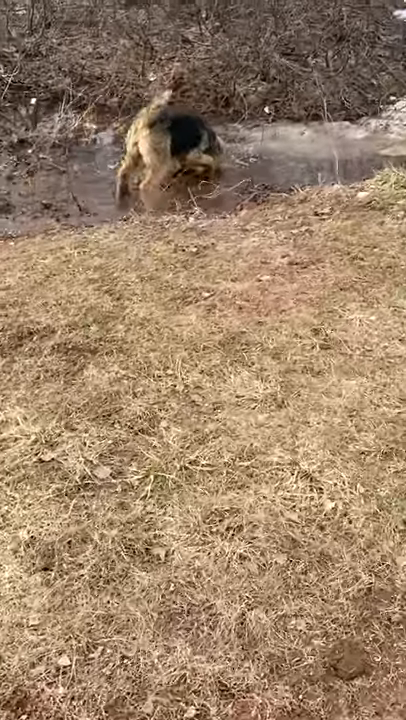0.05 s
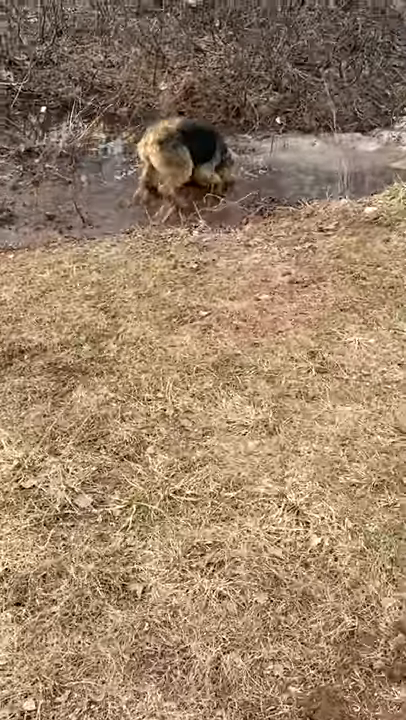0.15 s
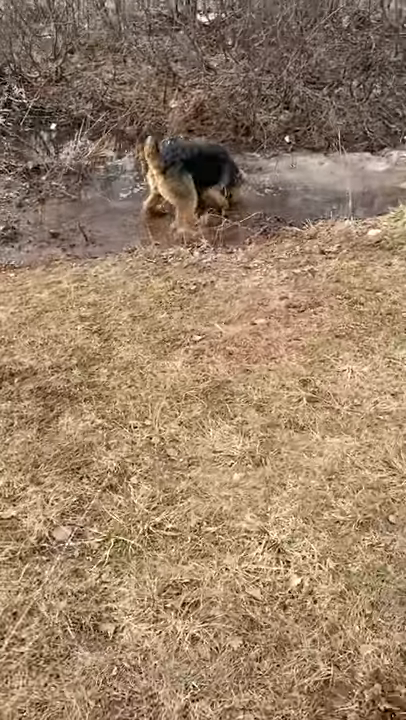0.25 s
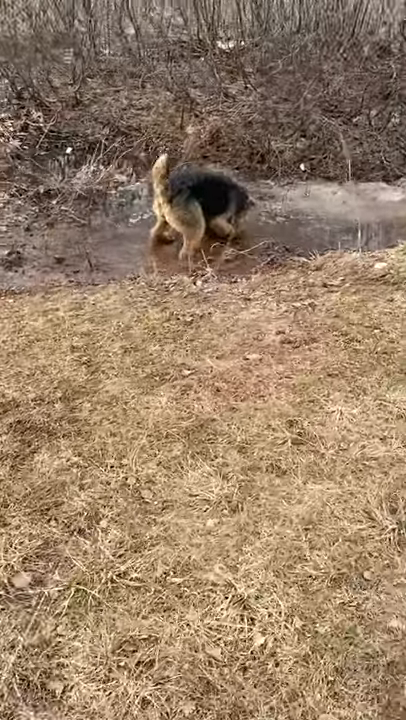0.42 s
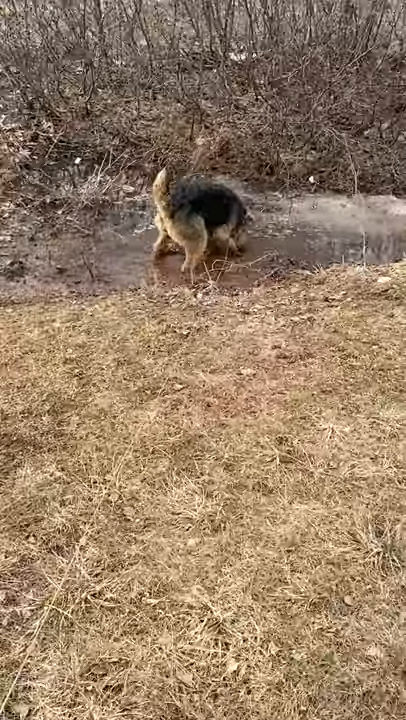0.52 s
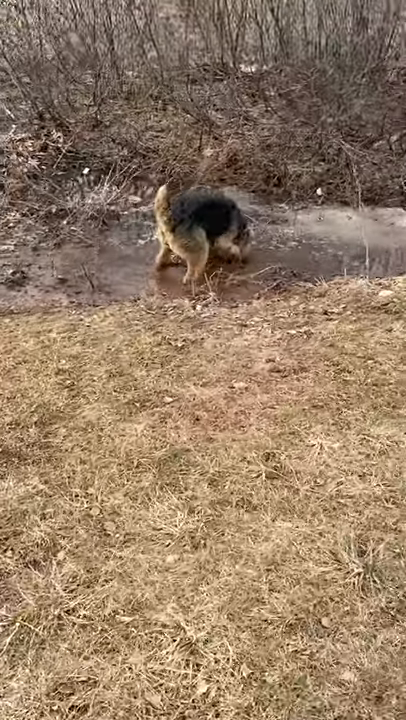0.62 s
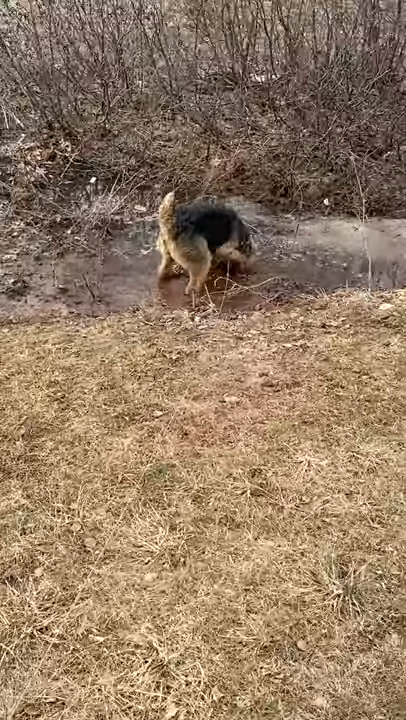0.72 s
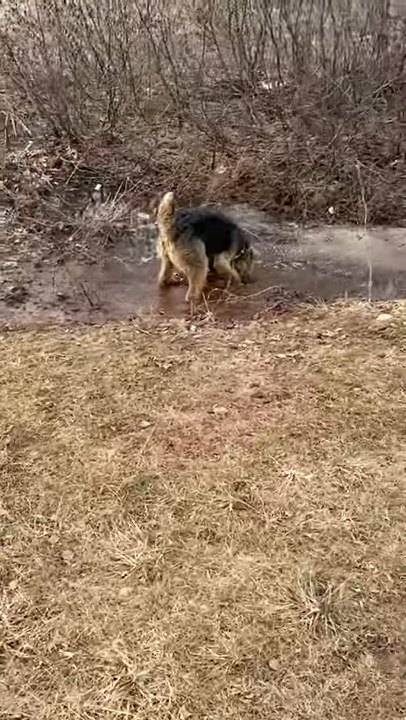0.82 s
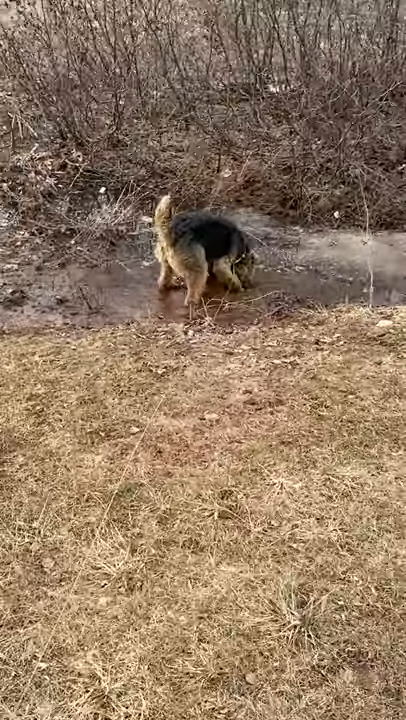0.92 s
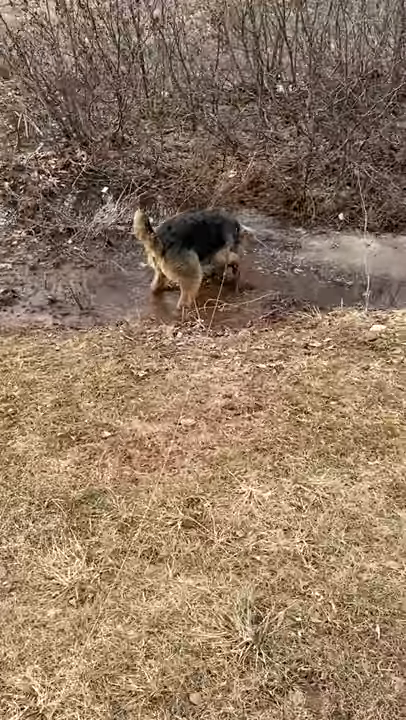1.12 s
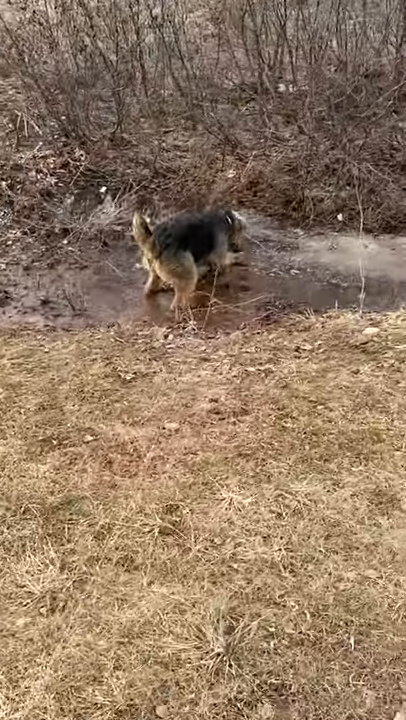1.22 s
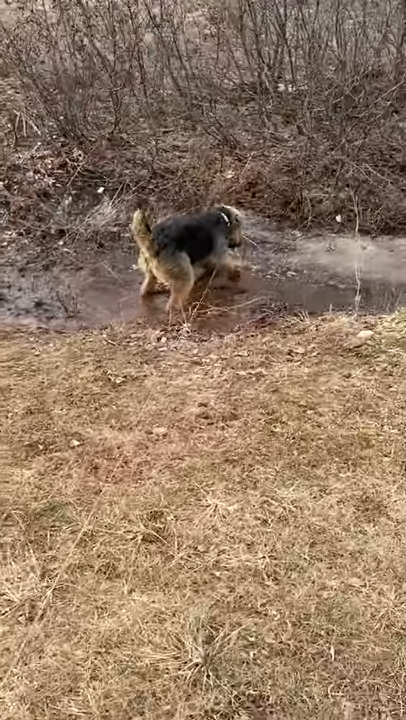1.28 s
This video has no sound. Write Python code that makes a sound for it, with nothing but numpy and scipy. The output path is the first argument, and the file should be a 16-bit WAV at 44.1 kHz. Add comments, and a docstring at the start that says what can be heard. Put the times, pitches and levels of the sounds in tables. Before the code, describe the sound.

Light irregular paw splashes and ringing water drops from a dog wading in a puddle, heard in wide stereo over soft open-air hiss, with wind rumbling and thumping on the microphone and the liveliest splashes last.

```python
"""A dog paddles through a shallow muddy puddle: each paw throws a burst of spray and small bubbles.
Spray is grainy hiss; bubbles and drops are short ringing tones that rise in pitch as they die away.
A faint whistle, made of narrow noise, passes on the left. Wind rumbles and puffs on the microphone,
made from slow low noise and single low pulses, over a soft outdoor hiss.
Left and right differ in phase, wound further apart up the treble, for a wide stereo image."""
import sys
import numpy as np
from scipy import signal
from scipy.fft import rfft, irfft, next_fast_len
from scipy.io import wavfile
from scipy.ndimage import uniform_filter1d, map_coordinates

SR = 44100
rng = np.random.default_rng(int(sys.argv[2]) if len(sys.argv) > 2 else 0)


def master(y):
    """Save y as 16-bit WAV."""
    cut = np.clip(np.atleast_2d(y).T, -1, 1)
    pcm = np.round(cut * 32767)  # scale
    wavfile.write(sys.argv[1], SR, pcm.astype(np.int16))


N = 59535  # length in samples
T = np.arange(N) / SR  # time of every sample, s

# Paw splashes, levels before the envelope: start_s, level_db, rise_s, hold_s, fall_by_60_db_s, tilt_db_per_octave
PAW_SPLASHES = [(.001, -52.5, 0.00054, 0.0011, 0.062, 1), (.008, -54, 0.0017, 0.0039, 0.49, -2),
                (0.108, -50, 0.038, 0.038, 0.4, -4), (0.159, -43, 0.00099, 0.0014, 0.018, 1),
                (0.206, -56, 0.0016, 0.027, 0.056, 3), (0.2164, -44, 0.00083, 0.0043, 0.048, -2.5),
                (0.249, -32, 0.0037, 0.003, 0.023, 3), (0.26, -45, 0.005, 0.006, 0.024, -1),
                (0.261, -51.5, 0.0022, 0.019, 0.24, -1), (0.305, -59, 0.0052, 0.012, 0.13, 1.5),
                (0.365, -50, 0.0017, 0.00092, 0.008, -3), (0.384, -67.5, 0.009, 0.06, 0.056, 2),
                (0.463, -55, 0.0059, 0.009, 0.16, -1), (0.489, -58, 0.003, 0.0064, 0.022, 8),
                (0.503, -52, .002, 0.0018, 0.024, 8), (0.5225, -44.5, 0.00088, 0.013, 0.17, -3.5),
                (0.5445, -42.5, 0.0016, 0.0032, 0.072, -1.5), (0.598, -54.5, 0.0033, 0.015, .03, -6),
                (0.645, -59.5, 0.0049, 0.063, 0.024, -1.5), (0.808, -50, 0.0084, 0.029, 0.25, -1.5),
                (0.962, -50.5, 0.00093, 0.00076, 0.02, 3.5), (0.97, -60.5, 0.0049, 0.026, 0.11, -1),
                (1.1002, -43, .0006, 0.0015, 0.045, -6), (1.102, -49, 0.0018, 0.026, 0.055, -4),
                (1.12, -46, 0.029, 0.045, 0.32, -1.5), (1.256, -51.5, 0.0024, 0.0027, 0.3, 0),
                (1.262, -37, 0.00051, 0.001, 0.04, 1.5), (1.28, -40.5, 0.0028, 0.0022, 0.022, 4.5),
                (1.284, -53.5, .002, .003, 0.19, 9), (1.2985, -45, 0.00062, 0.00075, 0.0086, 4),
                (1.3, -58.5, 0.0024, 0.016, 0.11, -3), (1.342, -36.5, 0.0029, 0.0017, 0.057, 0)]
# Tone colour of the spray before each splash's tilt: pitch_hz, level_db
SPRAY_COLOUR = [(200, -5), (450, 0), (1000, 1), (1700, 1.5), (2300, -1), (5000, 2), (6000, -1.5),
                (15600, -7), (16000, -32), (17000, -43)]
GRAIN_DB, SMOOTH_S = 4.2, .035  # grain depth; a splash held this long has half of it
MIN_RISE_S, MIN_FALL_S = 3e-4, .005
# Small bubbles: average number per second, middle pitch, spread of log pitch
BUBBLE_RATE, BUBBLE_HZ, BUBBLE_SPREAD = 260, 3000, .4
# Lowest bubble level against the splash, and the splash level above which bubbles grow no louder
BUBBLE_DB, BUBBLE_TOP_DB = -4, -48

# Short rings heard singly; the first is a click at the very start, the rest are drops and bubbles.
# Levels before the ring shape: start_s, level_db, pitch_hz, life_cycles
SINGLE_RINGS = [(.0005, -19, 4550, 3), (.008, -40, 1005, 4.9), (0.01, -39.5, 1510, 7.8),
                (.044, -43.5, 517, 3.2), (.111, -43, 1960, 4.7), (.131, -33.5, 1610, 2.3),
                (0.137, -38, 1600, 5.3), (0.159, -30, 1910, 6.4), (.164, -38, 3100, 11),
                (0.2185, -38, 3630, 9.2), (0.2207, -34, 1170, 2.8), (0.229, -32.5, 2780, 5.2),
                (.247, -28, 10500, 5.6), (0.4363, -45.5, 2900, 7.8), (0.496, -41, 2020, 6),
                (0.5269, -33, 950, 0.99), (.529, -31.5, 545, 2.5), (.549, -34, 790, 2.6),
                (.5477, -36.5, 1700, 8.1), (0.554, -38, 3280, 7.3), (0.6102, -32, 870, 0.54),
                (.686, -45, 2980, 8.6), (0.755, -46, 2620, 4.6), (.764, -51, 3180, 9.8),
                (0.772, -45, 1370, 8.2), (0.788, -49, 2950, 13), (.813, -34.5, 2170, 3.1),
                (.822, -32.5, 4500, 4.9), (0.826, -30, 3960, 4.4), (0.8446, -33.5, 2200, 4.7),
                (0.85, -35.5, 4230, 8), (.866, -44, 4630, 4.5), (0.878, -42, 2110, 5.7),
                (0.895, -45, 2100, 5.5), (0.901, -38.5, 4890, 8.8), (0.903, -45, 1270, 6),
                (0.988, -38, 4540, 5.9), (1.006, -45, 4660, 7.6), (1.03, -49, 5030, 5.7),
                (1.1, -29.5, 1210, 3.1), (1.1071, -32, 1210, 2.7), (1.127, -36, 3400, 15),
                (1.211, -40, 716, 4.2), (1.158, -35.5, 1880, 4.9), (1.261, -24.5, 1660, 6.7),
                (1.2614, -22.5, 2900, 5.9), (1.2645, -24, 3660, 6), (1.263, -29, 4210, 9.7),
                (1.2638, -23.5, 4990, 9.8), (1.3435, -24, 816, 0.72), (1.3438, -36, 4200, 32)]
RING_RISE = 0.03  # how strongly the pitch climbs
TICK_RATE, TICK_HZ, TICK_DB = 27, 7900, -55  # droplets per second, pitch scale, lowest level

# A faint whistle, level before its envelope: start_s, end_s, pitch_hz, width_hz, left_level_db, right_against_left_db
WHISTLE_SETTINGS = (.128, .222, 1600, 200, -54, -9)

# Strength of the wind rumble before the RUMBLE_DB trim: time_s, level_db
WIND_STRENGTH = [(0.0, -46), (0.087, -37), (0.296, -24.5), (0.344, -24), (0.39, -17.5), (0.473, -26),
                 (0.518, -35), (0.539, -37), (0.578, -35), (0.652, -28.5), (0.748, -47), (0.845, -33.5),
                 (0.912, -39.5), (1.014, -42), (1.1, -48), (1.134, -42.5), (1.252, -43), (1.35, -50)]
# Tone colour of the wind rumble: pitch_hz, level_db
RUMBLE_COLOUR = [(25, -22), (40, -2), (60, 6), (100, -1.5), (160, -7.5), (250, -13), (400, -25), (700, -53),
                 (1200, -102)]
RUMBLE_DB = -10.5
LUMP_DB, LUMP_RATE = 3.5, 30  # size of the lumps, random points per second
# Single puffs of air, before the bass lag: time_s, peak_level_db, brightest_hz
AIR_PUFFS = [(.004, -29.5, 113), (0.019, -37.5, 121), (0.085, -33.5, 202), (0.107, -35, 207),
             (0.14, -29.5, 216), (0.164, -30, 363), (0.176, -24.5, 234), (0.19, -39, 230),
             (0.223, -22, 304), (0.253, -24.5, 164), (0.279, -20.5, 264), (0.301, -18, 188),
             (0.323, -27, 227), (0.3296, -17.5, 477), (.3345, -22, 685), (0.3336, -6, 194),
             (0.348, -17, 300), (0.355, -19.5, 420), (0.3613, -8, 500), (.3655, -13, 192),
             (0.391, -33, 170), (.394, -37, 418), (0.409, -22.5, 119), (0.422, -28.5, 446),
             (0.435, -19.5, 103), (0.441, -31, 280), (0.452, -24, 93), (0.464, -54, 320),
             (0.53, -33.5, 145), (0.616, -34, 350), (0.621, -46, 201), (.647, -38, 735),
             (0.652, -22.5, 449), (0.658, -28.5, 293), (.662, -40, 483), (.667, -34, 443),
             (0.783, -36, 200), (0.831, -31.5, 318), (0.832, -29.5, 147), (0.86, -35, 154),
             (0.967, -43.5, 150), (0.99, -34.5, 144), (1.023, -40.5, 116), (1.12, -38.5, 242),
             (1.129, -33.5, 109), (1.17, -39, 129.6), (1.181, -56, 126)]
# Bass limit: at least this pitch or this share of the brightest pitch; then steepness of the treble fall
PUFF_LOW_HZ, PUFF_LOW_SHARE, PUFF_SLOPE = 51, 0.24, 3.42
BASS_LAG_CYCLES, LAG_FREE_HZ = 1.2, 600  # strength of the bass delay, pitch with no delay

# Tone colour of the far hiss: pitch_hz, level_db
AIR_COLOUR = [(150, -22), (300, 1), (700, 3), (1500, -2), (2100, -11.5), (4000, -14), (7000, -20.5),
              (12000, -23.5), (15500, -25), (16000, -56)]
AIR_DB, AIR_PATCHY_DB = -58, 2

# How alike left and right are before the phase is wound apart, 1 being the same: pitch_hz, likeness
LEFT_RIGHT_LIKENESS = [(100, .99), (500, 0.75), (1000, 0.68), (1500, 0.1), (2100, 0.93), (5000, 0.93),
                       (15000, 0.97)]
# Phase and level of left against right: pitch_hz, lead_radians, level_db
LEFT_RIGHT_PHASE = [(0, -.13, 0), (300, -.25, 0), (520, 0, 0), (800, .7, 2.5), (1600, .2, 4),
                    (2100, .2, .3), (2600, .6, 0), (3400, .1, 0), (4400, .8, 0), (5000, .2, 0),
                    (5500, .8, 0), (6950, 3.1, 0), (7750, 3.2, 0), (9800, 6.2, 0), (10900, 6.35, 0),
                    (13050, 9.35, 0), (14000, 9.5, 0), (15900, 12.4, 0)]
TOP_HZ = 16700  # nothing is kept from here up


def amp(db):
    """Turn decibels into a plain multiplier."""
    return 10 ** (np.asarray(db) / 20)


def unit(x):
    """Scale a signal to an average strength (rms) of 1."""
    return x / np.sqrt(np.mean(x ** 2) + 1e-20)


def along(points, hz):
    """Read between (pitch, value) points on a log pitch axis."""
    f, v = np.transpose(points)
    return np.interp(np.log(hz + 1), np.log(f + 1), v)


def filtered(x, response):
    """Change the strength and timing of each pitch by a complex response."""
    size = next_fast_len(N + SR // 2)
    hz = np.fft.rfftfreq(size, 1 / SR)
    return irfft(rfft(x, size) * response(hz), size)[..., :N]


def paired(a, b, spectrum):
    """Mix two noises into a coloured left and right of rms 1, as alike as the likeness table says."""
    def middle_and_side(hz):
        turn = np.arccos(np.clip(along(LEFT_RIGHT_LIKENESS, hz), -1, 1)) / 2
        return amp(along(spectrum, hz)) * [np.cos(turn), np.sin(turn)]

    mid, side = filtered(np.array([a, b]), middle_and_side)
    return unit(np.array([mid + side, mid - side]))


def patchy(depth_db, size, bins, frames):
    """Two noises share one field of random loudness patches over time and pitch."""
    z = signal.stft(rng.standard_normal((2, N)), nperseg=size)[2]
    field = rng.standard_normal(z.shape[1:])
    field = uniform_filter1d(field, bins, 0)  # smooth over pitch
    field = uniform_filter1d(field, frames, 1)  # smooth over time
    return signal.istft(z * amp(depth_db * unit(field)), nperseg=size)[1][:, :N]


def rings(s, db, hz, cycles, size=400):
    """Damped sines that rise in pitch, as a bubble does when it nears the surface."""
    t = np.arange(size) / SR
    life = t * (hz / cycles)[:, None]
    tone = np.sin(2 * np.pi * hz[:, None] * t * (1 + RING_RISE * life))
    swell_and_fade = 11 * life ** 1.4 * np.exp(-4.3 * life)
    ring = amp(db)[:, None] * tone * swell_and_fade
    at = (s * SR).astype(int)[:, None] + np.arange(size)
    return np.bincount(at.ravel(), ring.ravel(), N + size)[:N]  # add up overlapping rings


def splashes():
    """Spray is hiss in short bright grains that rises, holds and dies away; small bubbles follow its strength."""
    spray, strength = np.zeros((2, N)), np.zeros(N)
    for s, db, rise, hold, t60, tilt_db in PAW_SPLASHES:
        rise, t = max(rise, MIN_RISE_S), T - s
        fall = amp(-60 * np.maximum(t - rise - hold, 0) / max(t60, MIN_FALL_S))
        shape = amp(db) * np.clip(t / rise, 0, 1) * fall
        # longer splashes are denser, so smoother
        grain = patchy(GRAIN_DB / (1 + max(hold, 0) / SMOOTH_S), 64, 6, 2)
        colour = [(hz, v + tilt_db * np.log2(hz / 2000)) for hz, v in SPRAY_COLOUR]
        spray += shape * paired(*grain, colour)
        strength += shape
    return spray + bubbles(strength)


def bubbles(strength):
    """Small bubbles ring at random moments, louder where the spray is stronger, up to a limit."""
    u = rng.random((4, 600))
    s = np.cumsum(-np.log(u[0])) / BUBBLE_RATE
    keep = s < T[-1]
    hz = BUBBLE_HZ * np.exp(BUBBLE_SPREAD * rng.standard_normal(600))
    splash_db = 20 * np.log10(np.interp(s, T, strength) + 1e-9)
    db = BUBBLE_DB + 8 * u[1] + np.minimum(splash_db, BUBBLE_TOP_DB)
    cycles = 3 + 6 * u[2]
    return rings(s[keep], db[keep], hz[keep], cycles[keep])


def single_rings():
    """A click at the very start, then single drops and bubbles, each as one short ring."""
    return rings(*np.transpose(SINGLE_RINGS))


def ticks():
    """Tiny droplets fall back at random all through, each a short, mostly high ring."""
    u = rng.random((300, 4))
    s = np.cumsum(-np.log(u[:, 0])) / TICK_RATE
    keep = s < T[-1]
    s, u = s[keep], u[keep]
    db = TICK_DB + 11 * u[:, 1]
    hz = TICK_HZ * (0.38 + 1.3 * u[:, 2])
    return rings(s, db, hz, 3 + 4 * u[:, 3])


def whistle():
    """Narrow noise like a breathy tone; it comes on quickly, stays nearly level and stops quickly, mostly on the left."""
    start, end, hz, width_hz, db, right_db = WHISTLE_SETTINGS
    noise = rng.standard_normal((2, N))
    tone = unit(filtered(noise, lambda f: np.exp(-((f - hz) / width_hz) ** 2)))
    envelope = np.sin(np.pi * np.clip((T - start) / (end - start), 0, 1)) ** 0.18
    return amp([[db], [db + right_db]]) * tone * envelope


def wind():
    """Lumpy rumble and single puffs; the bass arrives late, so each puff falls in pitch."""
    def bass_lag(f):
        cycles = BASS_LAG_CYCLES * (np.log((f + 1) / LAG_FREE_HZ) - f / LAG_FREE_HZ)
        return np.exp(-2j * np.pi * cycles)

    return filtered(rumble() - puffs(), bass_lag)


def rumble():
    """Low noise whose loudness wanders in slow random lumps and follows the wind strength."""
    s, db = np.transpose(WIND_STRENGTH)
    points = rng.standard_normal(int(T[-1] * LUMP_RATE) + 4)
    lumps = map_coordinates(points, [T * LUMP_RATE])  # smooth curve through the points
    noise = amp(LUMP_DB * lumps) * rng.standard_normal(N)
    low_noise = unit(filtered(noise, lambda f: amp(along(RUMBLE_COLOUR, f))))
    return amp(np.interp(T, s, db) + RUMBLE_DB) * low_noise


def puffs():
    """Each puff is one click with its treble and deepest bass removed, leaving a soft low thump."""
    out = np.zeros(N)
    for at, level_db, top_hz in AIR_PUFFS:
        low_hz = max(PUFF_LOW_HZ, PUFF_LOW_SHARE * top_hz)

        def shape(f):
            treble_cut_and_delay = np.exp(-(f / top_hz) ** PUFF_SLOPE - 2j * np.pi * f * at)
            return treble_cut_and_delay / (1 + (low_hz / (f + 1)) ** 4)

        puff = filtered(T == 0, shape)
        out += amp(level_db) * puff / abs(puff).max()
    return out


def air():
    """Soft far hiss: coloured noise with gentle random patches of loudness."""
    return amp(AIR_DB) * paired(*patchy(AIR_PATCHY_DB, 512, 30, 5), AIR_COLOUR)


def scene():
    """Add all the sounds together."""
    return splashes() + single_rings() + ticks() + whistle() + wind() + air()


def record(dry):
    """Wind left and right apart in phase up the treble, lift the left near 1 kHz and cut the very top."""
    f, lead, db = np.transpose(LEFT_RIGHT_PHASE)

    def left_and_right(hz):
        # the left gets half the difference, the right gets the opposite half
        half = np.exp(.5j * np.interp(hz, f, lead)) * amp(np.interp(hz, f, db) / 2)
        return np.array([half, 1 / half]) * (hz < TOP_HZ)

    return filtered(dry, left_and_right)


dry = scene()
out = record(dry)
master(out)
```